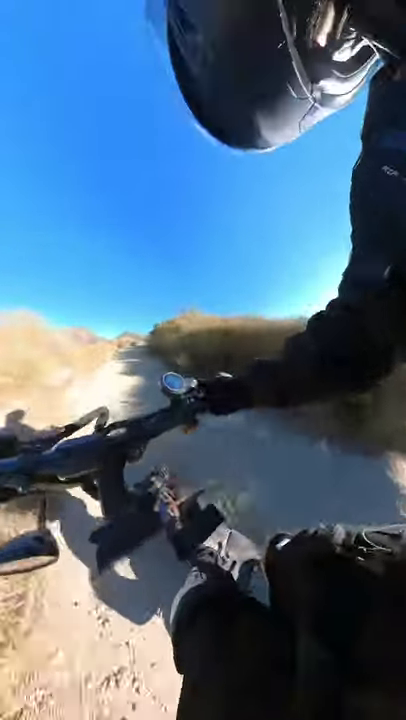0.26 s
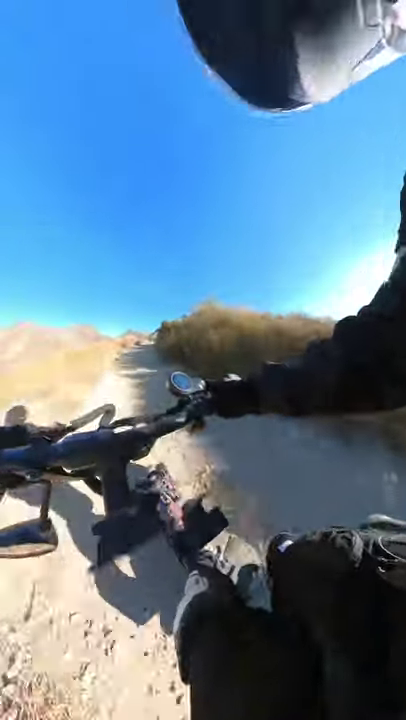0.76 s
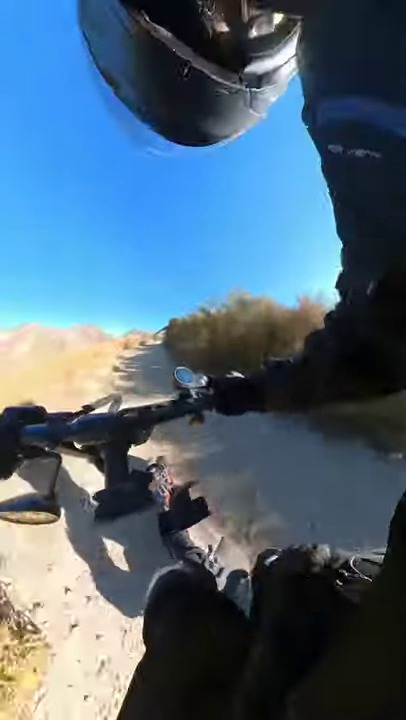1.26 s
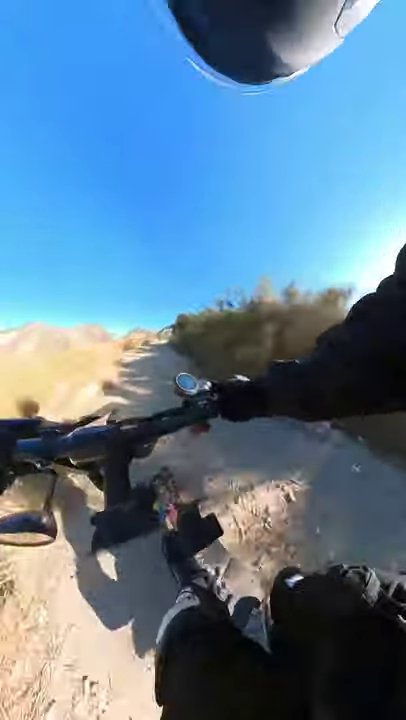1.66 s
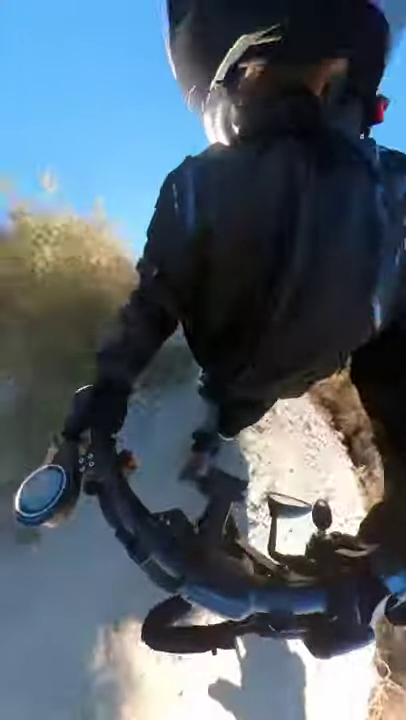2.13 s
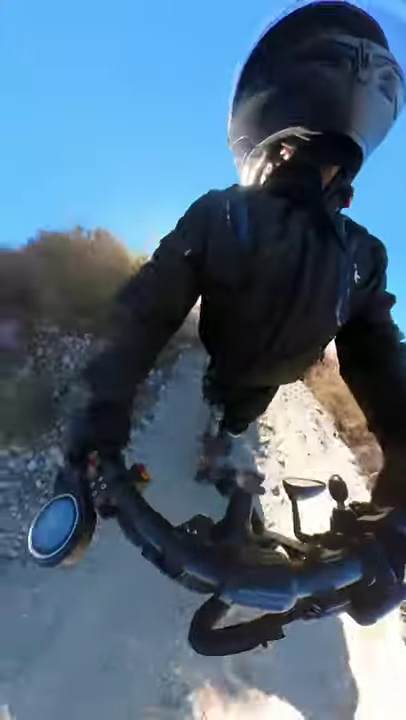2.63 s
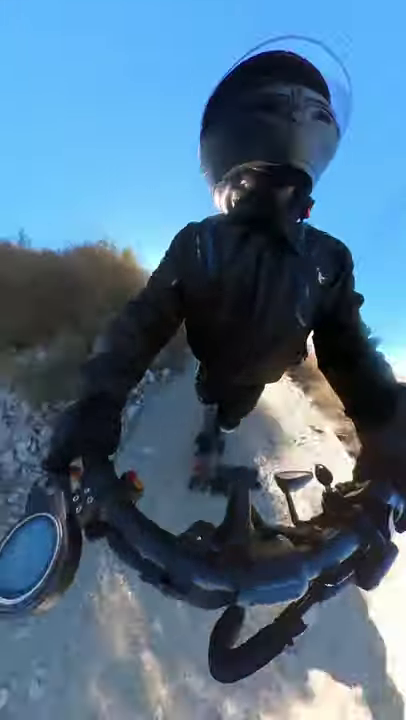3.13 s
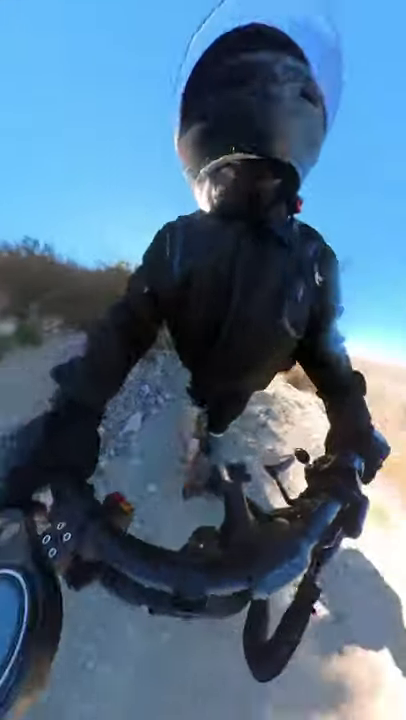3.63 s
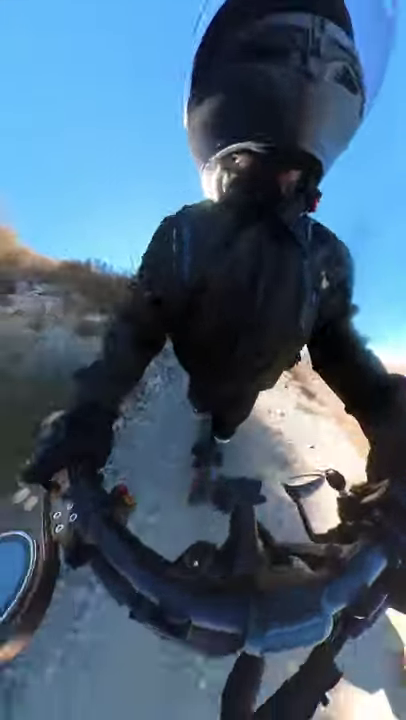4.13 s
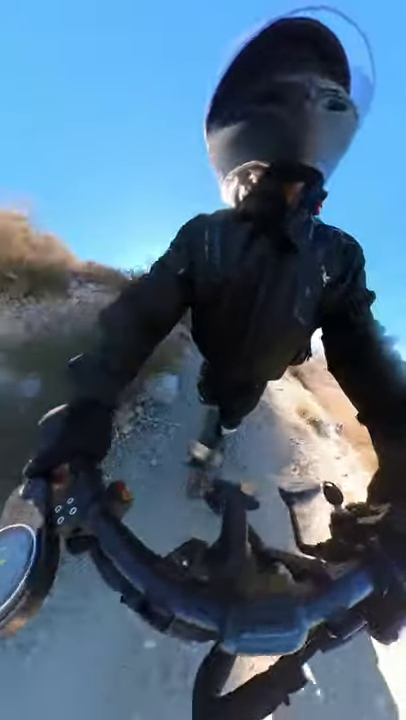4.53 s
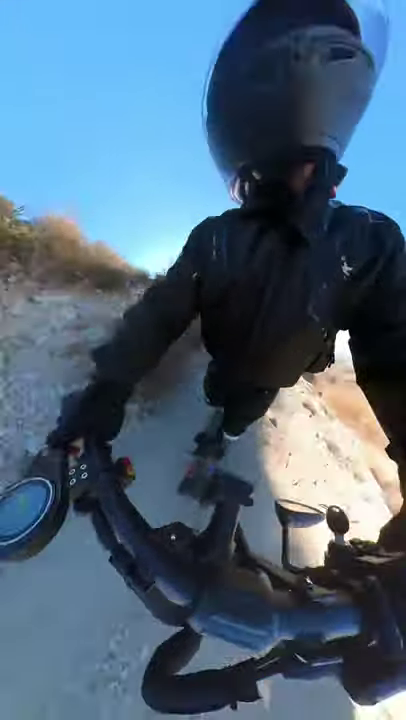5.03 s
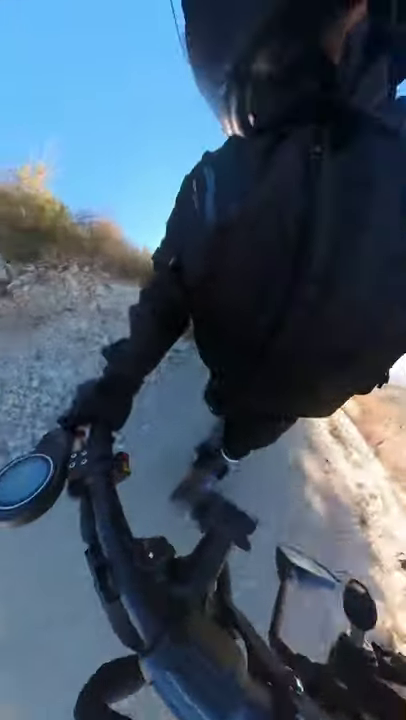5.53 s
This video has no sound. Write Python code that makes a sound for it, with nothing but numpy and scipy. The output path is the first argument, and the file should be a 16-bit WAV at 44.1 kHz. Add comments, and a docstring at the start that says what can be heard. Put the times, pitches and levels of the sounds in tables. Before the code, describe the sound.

An electric scooter rolls along a gravel trail in the open, heard very close from its handlebar. From 0 to about 2.06 seconds the sound is loud, wide and bass-heavy: a wavering low tyre rumble, coarse crunching, and hollow stone knocks on the deck every tenth of a second or so, strong near 0.2, 0.5, 1.0 and 1.3. A low motor hum swells briefly, most clearly around 0.15 and 0.64, then weaker. Rumble and crunch surge and dip unevenly from 1.6 to 2.0, with grit spraying at 1.3 and 1.6. At 2.06 it cuts abruptly to a much quieter, nearly mono stretch with no hum or deck knocks. Soft rumble continues under faint hiss, small dry stone cracks and tiny bright ticks. A denser burst of crunch and grit comes around 3.6 to 3.9, another sharp crack near 4.7, and scattered cracks continue until the end at about 5.8.

```python
"""Electric scooter on gravel

An electric scooter rolls over a gravel trail, heard by a camera clamped to its handlebar.
Shaped noise makes the tyre rumble, crunch and grit; short rings make single stones; sines make the hum.
Two stretches are joined: a wide one with hum and hiss, then a quieter one that is nearly alike in
both ears and has no hum. The frame colours it all and a limiter holds the peaks."""
import sys
import numpy as np
from scipy import signal
from scipy.fft import rfft, irfft
from scipy.io import wavfile
from scipy.ndimage import uniform_filter1d, minimum_filter1d

SR = 44100
rng = np.random.default_rng(int(sys.argv[2]) if len(sys.argv) > 2 else 0)


def unload_wav(signal):
    """Save mono or channel-first audio to the path in sys.argv[1] as 16-bit WAV at rate SR, clipped to [-1, 1]."""
    wavfile.write(
        sys.argv[1],
        SR,
        np.round(np.clip(np.atleast_2d(signal).T, -1, 1) * 32767).astype(np.int16),
    )


N = 255339
JOIN_S = 2.06  # the second stretch starts here

# Tone colour through frame and microphone, for the part both ears share: pitch_hz, level_db
FIRST_SHARED_COLOUR = [(18, -45.5), (30, -25.5), (48, -28), (95, -5), (117, 3.5), (161, -6.5), (264, -7.5),
                       (362, -13.5), (662, -23), (931, -28), (1180, -26), (1660, -39.5), (3640, -58.5),
                       (5250, -67), (15800, -54.5)]
# The same for the part that is opposed between the ears: pitch_hz, level_db
FIRST_OPPOSED_COLOUR = [(18, -49), (30, -32.5), (48, -16.5), (103, 1.5), (220, -1.5), (264, -9.5),
                        (301, -2.5), (509, -7), (596, -20.5), (1030, -22.5), (1240, -30.5), (2460, -48.5),
                        (3740, -57), (6830, -75), (10000, -75), (15800, -60.5)]
# Tone colour of the second stretch: pitch_hz, level_db
SECOND_SHARED_COLOUR = [(18, -45), (30, -40), (43, -33), (66, -13), (120, 1), (165, 3), (220, -8.5),
                        (264, -7.5), (435, -11.5), (680, -24.5), (1380, -29.5), (1660, -26.5), (4370, -47),
                        (9350, -39.5), (15800, -46.5)]
# How far the sound leans left, per pitch: pitch_hz, lean_share (-1 to 1)
LEAN_LEFT = [(25, -0.42), (60, -0.66), (110, -0.79), (200, 0.55), (700, 0.21), (1290, 0.043), (2400, 0.82),
             (4400, 0.37), (8000, 0.), (15000, 1)]
# Rumble of the rolling tyres: time_s, level_db
TYRE_RUMBLE = [(0, -23), (1.3, -26), (1.71, -22.5), (1.75, -35), (1.87, -19), (1.91, -34), (1.97, -25.5),
               (2.05, -26), (2.07, -43.5), (2.11, -30), (3.16, -29), (3.21, -36), (3.26, -30.5),
               (5.79, -30)]
# How loudly the loose gravel crunches: time_s, level_db
GRAVEL_CRUNCH = [(0.03, -31), (0.64, -36.5), (0.92, -28.5), (1.06, -35.5), (1.2, -36.5), (1.33, -28.5),
                 (1.5, -32.5), (1.575, -32), (1.63, -25.5), (1.7, -38.5), (1.76, -39), (1.85, -29.5),
                 (1.91, -39), (2.0, -34.5), (2.05, -28.5), (2.07, -51), (2.15, -38.5), (2.3, -44.5),
                 (2.85, -44.5), (3.2, -50), (3.26, -43), (3.66, -43.5), (3.71, -31.5), (3.77, -41),
                 (3.95, -40.5), (4.09, -50), (4.13, -53), (4.19, -45.5), (4.43, -41), (4.47, -48.5),
                 (4.78, -41.5), (4.91, -52), (4.98, -37), (5.06, -50.5), (5.11, -42), (5.79, -44.5)]
# Gusts of loose grit sprayed up: peak_s, boost_db (over the steady grit)
GRIT_SPRAYS = [(1.33, 6), (1.6, 9), (2.155, 4), (2.33, 6), (2.555, 5.5), (3.7, 6), (3.87, 5), (4.71, 8),
               (5.11, 4)]
# Stones knocking the deck: start_s, level_db, pitch_hz
DECK_KNOCKS = [(0.104, -32.5, 740), (0.1956, -23, 824), (0.25, -23.5, 704), (0.415, -29, 993),
               (0.5405, -18, 1126), (0.692, -23.5, 840), (0.776, -25.5, 660), (0.913, -31, 673),
               (0.988, -19, 740), (1.099, -28.5, 1090), (1.274, -25, 1088), (1.288, -26, 1023),
               (1.323, -21, 1120), (1.35, -22.5, 735), (1.399, -40, 670), (1.629, -25, 684),
               (1.828, -24, 1230), (1.857, -25.5, 640)]
# Stones cracking under the tyre: start_s, level_db
STONE_CRACKS = [(.109, -26.5), (0.194, -26.5), (0.54, -30), (.587, -43.5), (0.693, -34.5), (0.818, -32),
                (0.909, -32), (0.926, -30), (.983, -29.5), (1.053, -35.5), (1.289, -31), (1.323, -28.5),
                (1.398, -31.5), (1.54, -38.5), (1.618, -25), (1.684, -34.5), (1.81, -37.5), (1.828, -29.5),
                (1.859, -30.5), (2.148, -30), (2.1891, -29), (2.205, -41), (2.231, -45), (2.265, -35.5),
                (2.335, -32.5), (2.375, -46), (2.396, -35.5), (2.5271, -29.5), (2.597, -36), (2.677, -35),
                (2.8267, -37), (2.8662, -37.5), (3.029, -36), (3.051, -36), (3.159, -41.5), (3.318, -39.5),
                (3.468, -36.5), (3.554, -40), (3.57, -38), (3.663, -46), (3.6381, -29), (3.689, -30),
                (3.708, -33.5), (3.7219, -29), (3.745, -42), (3.792, -42), (3.821, -38), (3.8788, -30.5),
                (3.8918, -31), (3.917, -35.5), (4.038, -38), (4.063, -37.5), (4.095, -37.5), (4.2065, -39),
                (4.2363, -36.5), (4.279, -34.5), (4.294, -38), (4.397, -34), (4.4407, -35.5), (4.496, -38),
                (4.7279, -26), (4.8036, -33), (4.974, -33), (5.013, -36), (5.113, -36), (5.1744, -31),
                (5.2057, -29.5), (5.248, -39), (5.316, -37.5), (5.3645, -31), (5.503, -33), (5.5258, -32.5),
                (5.626, -41.5), (5.7067, -36.5), (5.766, -41)]
# Grit flung at the frame: start_s, level_db, pitch_hz
GRIT_TICKS = [(.928, -46, 11200), (1.292, -43, 11600), (1.326, -36, 12600), (1.685, -47, 10600),
              (2.1903, -33, 9050), (2.25, -50, 9750), (3.241, -45, 8560), (3.441, -46, 7880),
              (3.569, -46, 9000), (3.633, -31, 10300), (3.671, -48, 9500), (3.689, -41, 9150),
              (3.722, -39, 10600), (3.826, -46, 10400), (3.892, -46, 11000), (3.995, -41, 8460),
              (4.038, -45, 7800), (4.235, -49, 8830), (4.277, -45, 7940), (4.367, -46, 9900),
              (4.394, -41, 8900), (4.44, -46, 10200), (4.5877, -40.5, 9790), (4.699, -46.5, 9610),
              (4.745, -45, 10200), (4.8046, -36, 9000), (5.105, -43, 8510), (5.174, -35, 10000),
              (5.317, -45, 8500), (5.4863, -43.5, 8040), (5.505, -42, 8590), (5.534, -47, 7000)]
# Swells of the motor hum: peak_s, level_db, pitch_hz
HUM_SWELLS = [(.15, -11, 266.4), (0.419, -18, 267), (0.639, -10.5, 267.8), (1.32, -18, 254.5),
              (1.469, -18.5, 269.5), (1.569, -24, 270.4), (1.65, -27, 239.9), (1.851, -20.5, 252.4),
              (2.041, -21, 266.7)]
# Modes of the frame: pitch_hz, width_hz, boost_db
FRAME_MODES = [(480, 25, 0), (2110, 110, 3.5), (2886, 190, 4.5), (3640, 310, 4)]

# Pairs below hold one value for each stretch
CRUNCH_MEAN_DB = (-36, -46)
GRIT_DB = (-69.5, -67.5)  # grit where the crunch is at its mean
GRIT_SLOPE = (.8, .5)  # dB of grit gained per dB of crunch
SNAP_EDGE_DB = (-18.5, -14.5)  # bright edge of a crack, against its body
HEADROOM_DB, CEILING_DB = (3.0, 4.5), (-7.9, -18.3)  # gain into the limiter, and its ceiling

SPRAY_S, SWELL_S = 0.014, 0.032  # spread of a gust and of a hum swell
THUD_DB = 4  # thud of a crack, against its snap
STRIKE = 2.73  # size of the one blow inside a ring, against its noise
SECOND_LINE, SECOND_LINE_DB = 1.96, -11  # second hum line: pitch ratio and level
PORT_PHASE_RAD = (2.3, 2.84)  # shift of each hum line at the right ear
TOP_HZ = 15800  # nothing much passes above this


def ground(stretch, mid, side, crunch_bed, grit_bed):
    """Tyre on gravel: smooth rumble in the bass, ever more grainy crunch and grit above it."""
    (rumble_db,), (crunch_db,) = track(TYRE_RUMBLE), track(GRAVEL_CRUNCH)
    crunch_db = crunch_db + 1.6 * walk(12)  # small loose and packed patches
    # the same stones shake the deck's crunch and the grit
    stones = grains(110, 5, .016)
    low = rumble(mid, side) + undb(-3.5) * deck_shake(mid, side) + undb(-19) * drone()
    return (undb(rumble_db) * low
            + undb(crunch_db) * crunch(stones, crunch_bed, mid, side)
            + undb(grit_level(stretch, crunch_db)) * grit(stones, grit_bed, mid, side))


def rumble(mid, side):
    """Tyre rumble: low noise whose loudness wanders."""
    return layer(undb(1.7 * walk(12)), 12, 208, mid, side)


def deck_shake(mid, side):
    """The deck shakes: low-middle noise, part steady and part grainy."""
    env = undb(1.7 * walk(9)) * (0.25 + 0.65 * grains(40, 3.1, 0.04))
    return layer(env, 204.0, 810, mid, side)


def drone():
    """The deck drones: a tone near 480 Hz that wanders and surges; power 1."""
    turn = 2 * np.pi * np.cumsum(480 * (1 + .1 * walk(4))) / SR
    hum = undb(4.4 * walk(6)) * walk(60) * np.sin(turn)
    return hum / np.sqrt(np.mean(hum ** 2))


def crunch(stones, bed, mid, side):
    """Crunch: a steady bed, shared stones, and pebbles of three sizes, each in its own band."""
    total = 0
    for lo_hz, hi_hz, db in ((560, 1360, -6.5), (1230, 1660, -13.0), (2040, 5000, -23.5)):
        pebbles = grains(50, 5.5, .015)
        env = bed + 0.52 * stones + 0.88 * pebbles
        total = total + layer(env, lo_hz, hi_hz, mid, side) * undb(db)
    return total


def grit(stones, bed, mid, side):
    """Grit of three sizes: thin, short grains in high bands, over a flickering bed."""
    total = 0
    for lo_hz, hi_hz, db in ((4000, 4800, -3.0), (7000, 25600, -3.5), (11000, 31000, -5.5)):
        specks = grains(35, 3.5, .008)
        env = undb(2.4 * walk(20)) * (bed + 0.12 * stones + 0.2 * specks)
        total = total + layer(env, lo_hz, hi_hz, mid, side) * undb(db)
    return total


def grit_level(stretch, crunch_db):
    """Grit level in dB: looser gravel throws more grit, and gusts add a brief boost."""
    t = np.arange(N) / SR
    level_db = GRIT_DB[stretch] + GRIT_SLOPE[stretch] * (crunch_db - CRUNCH_MEAN_DB[stretch])
    return level_db + sum(db * np.exp(-.5 * ((t - s) / SPRAY_S) ** 2) for s, db in GRIT_SPRAYS)


def cracks(out):
    """Stones crack under the tyre: a short broad snap with a thud, then a softer neighbour."""
    for s, db in STONE_CRACKS:
        size = np.exp(.18 * rng.standard_normal())  # every stone has its own pitch
        edge = undb(SNAP_EDGE_DB[int(s > JOIN_S)]) * burst(2540, 0.38, 0.018)
        snap = burst(1140 * size, 0.53, 0.022) + edge
        thud = burst(420 * size, .6, .04)
        add(out, s, undb(db) * (snap + undb(THUD_DB) * thud), 0)
        # a neighbour shifts just after, with the two draws swapped
        add(out, s + .016 * rng.random(), undb(db - 6) * snap[::-1], 0)


def knocks(out):
    """Stones knock the deck: a narrow ring with a low, broad thump of the tyre."""
    for s, db, hz in DECK_KNOCKS:
        ring = burst(hz, 0.16, 0.021)
        thump = undb(-4.5) * burst(368, 0.59, 0.038)
        add(out, s, undb(db) * (ring + thump), 2.5)


def ticks(out):
    """Grit ticks on the frame: a very short high ring that trails faint dust."""
    for s, db, hz in GRIT_TICKS:
        dust = undb(-16) * burst(hz, .2, .045)
        add(out, s, undb(db) * (burst(hz, 0.39, 0.006) + dust), 0.5)


def motor():
    """Hub motor: two hum lines swell together, waver a little and reach the ears nearly opposed."""
    t = np.arange(N) / SR
    level = sum(undb(db) * np.exp(-.5 * ((t - s) / SWELL_S) ** 2) for s, db, _ in HUM_SWELLS)
    pitch_hz = track(HUM_SWELLS)[1] * (1 + 0.0034 * walk(30))
    turn = 2 * np.pi * np.cumsum(pitch_hz) / SR
    ear = np.array([[0], [1]])
    first_line = np.sin(turn + ear * PORT_PHASE_RAD[0])
    second_line = np.sin(SECOND_LINE * turn + ear * PORT_PHASE_RAD[1])
    return level * (first_line + undb(SECOND_LINE_DB) * second_line)


def hiss(hz, width, db):
    """Steady hiss: a band of noise, unrelated in the two ears."""
    sos = signal.butter(2, [hz - width / 2, hz + width / 2], "band", fs=SR, output="sos")
    return undb(db) * signal.sosfilt(sos, rng.standard_normal((2, N)))


def frame(x):
    """The frame boosts its own modes in whatever shakes it."""
    f = np.fft.rfftfreq(N, 1 / SR)
    lift_db = sum(db / (1 + (2 * (f - hz) / width) ** 2) for hz, width, db in FRAME_MODES)
    return irfft(rfft(x) * undb(lift_db), N)


def layer(env, lo_hz, hi_hz, mid, side):
    """Noise under an envelope, kept to one band and coloured; power 1 in the shared part."""
    f = np.fft.rfftfreq(N, 1 / SR) + 1
    band = 1 / np.sqrt((1 + (lo_hz / f) ** 6) * (1 + (f / hi_hz) ** 6))
    a, b = rfft(env * rng.standard_normal((2, N))) * band
    shared = irfft(a * mid, N)
    # partly the same noise, which leans it to one ear, partly fresh noise, which widens it
    opposed = irfft(a * side[0] + b * side[1], N)
    return np.array([shared + opposed, shared - opposed]) / np.sqrt(np.mean(shared ** 2))


def grains(rate, scatter_db, t60):
    """Envelope of stones that crack at random and die away, a few much louder; mean power 1."""
    size_db = scatter_db * np.minimum(rng.exponential(size=N), 3.0)
    starts = (rng.random(N) < rate / SR) * undb(size_db)
    starts = uniform_filter1d(starts, int(t60 * SR / 2.5) + 1)  # soften each start
    env = signal.lfilter([1], [1, -1000 ** (-1 / (t60 * SR))], starts)
    return env / np.sqrt(np.mean(env ** 2))


def burst(hz, width, t60):
    """A short noisy ring in a band, drawn twice: shared by the ears and opposed between them."""
    t = np.arange(2048) / SR
    high_hz = min(hz * (1 + width), .45 * SR)
    sos = signal.butter(3, [hz / (1 + width), high_hz], "band", fs=SR, output="sos")
    rise = 1 - np.exp(-t / (t60 / 30))
    rattle = rng.standard_normal((2, len(t))) * rise * 1000 ** (-t / t60)
    blow = STRIKE * (t == t[60])  # one sharp sample, just over 1 ms in
    ring = signal.sosfilt(sos, rattle + blow)
    return ring / np.abs(ring).max(axis=1, keepdims=True)


def add(out, s, ring, side_db):
    """Lays a ring into both channels; only the wide stretch gets the opposed part."""
    m, d = ring[0], ring[1] * undb(side_db) * (s < JOIN_S)
    i = int((s - .001) * SR)  # start early: the ring takes a moment to build
    out[:, i:i + len(m)] += np.array([m + d, m - d])[:, :N - i]


def walk(rate):
    """A random level that slides in straight lines to a new value about rate times a second."""
    k = int(SR / rate)
    return uniform_filter1d(np.repeat(rng.standard_normal(N // k + 1), k), k)[:N]


def track(table):
    """Columns of a table joined by straight lines in time."""
    s, *columns = np.transpose(table)
    return [np.interp(np.arange(N) / SR, s, c) for c in columns]


def over_hz(table):
    """A table read along a log-frequency axis."""
    hz, value = np.transpose(table)
    return np.interp(np.log(np.fft.rfftfreq(N, 1 / SR) + 1), np.log(hz), value)


def undb(db):
    """Decibels to gain."""
    return 10 ** (np.asarray(db) / 20)


def scene():
    """The wide stretch, then the one nearly alike in both ears; single stones on top."""
    lean = np.clip(over_hz(LEAN_LEFT), -1, 1)
    side = undb(over_hz(FIRST_OPPOSED_COLOUR)) * np.array([lean, np.sqrt(1 - lean ** 2)])
    wide = ground(0, undb(over_hz(FIRST_SHARED_COLOUR)), side, 1.17, 1.9)
    alike = ground(1, undb(over_hz(SECOND_SHARED_COLOUR)), 0 * side, 0.5, 0.28)
    wide = wide + motor()
    # two high hisses whose loudness wanders, then a steady one after the join
    wide = wide + undb(1.8 * walk(15)) * hiss(15300, 900, -57.5)
    wide = wide + undb(2.5 * walk(5.5)) * hiss(12500, 3500, -71.5)
    alike = alike + hiss(5170, 3160, -68.5)
    stones = np.zeros((2, N))
    cracks(stones)
    knocks(stones)
    ticks(stones)
    return frame(np.where(np.arange(N) / SR >= JOIN_S, alike, wide) + stones)


def record(dry):
    """A quick look-ahead limiter on each channel, with a lower ceiling after the join; then a top cut."""
    late = (np.arange(N) / SR >= JOIN_S).astype(int)
    loud = dry * undb(HEADROOM_DB)[late]
    hold = int(.0025 * SR)
    # the power of .85 lets peaks pass the ceiling a little
    gain = np.minimum(1, undb(CEILING_DB)[late] / (np.abs(loud) + 1e-9)) ** .85
    gain = uniform_filter1d(minimum_filter1d(gain, hold), hold)
    top_cut = signal.ellip(10, .2, 80, TOP_HZ, fs=SR, output="sos")
    return signal.sosfilt(top_cut, loud * gain)


dry = scene()
out = record(dry)
unload_wav(out)
```